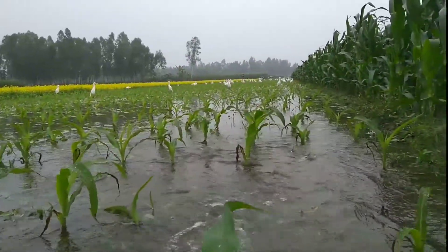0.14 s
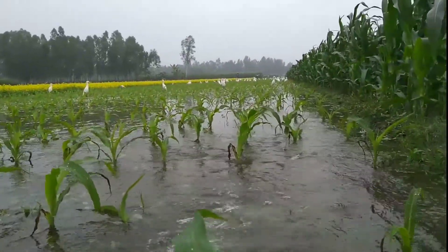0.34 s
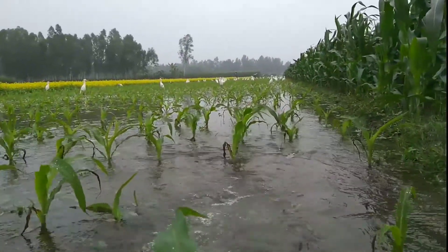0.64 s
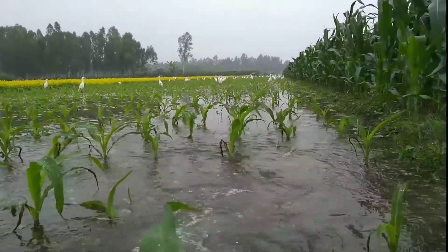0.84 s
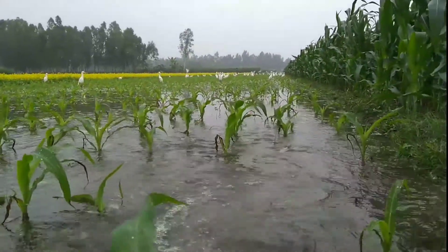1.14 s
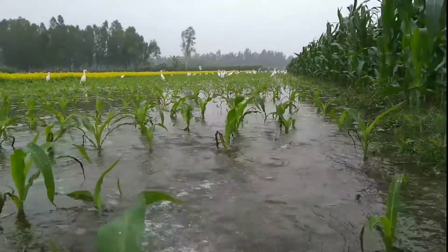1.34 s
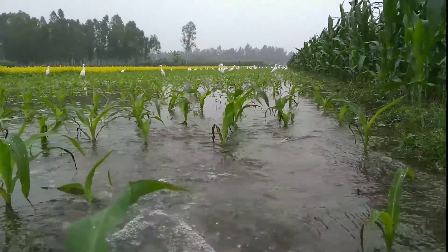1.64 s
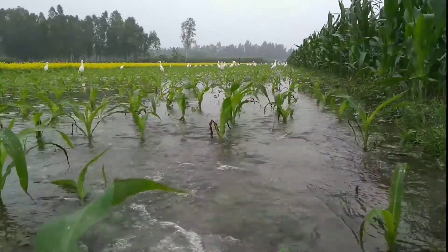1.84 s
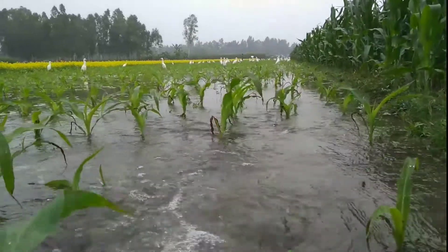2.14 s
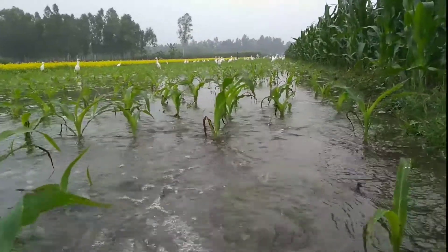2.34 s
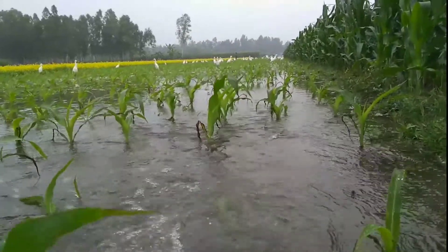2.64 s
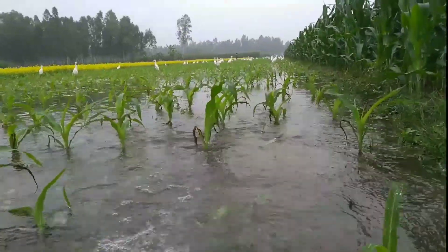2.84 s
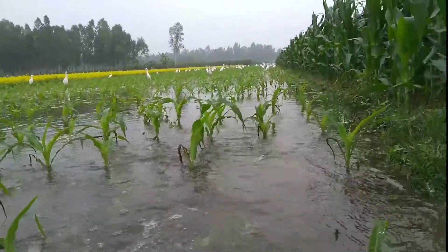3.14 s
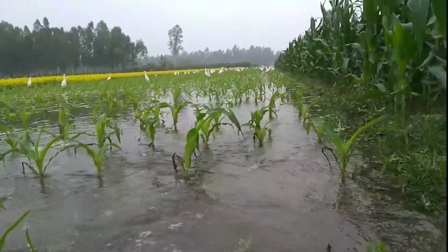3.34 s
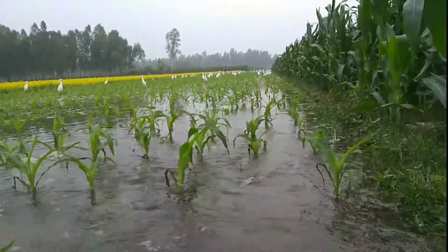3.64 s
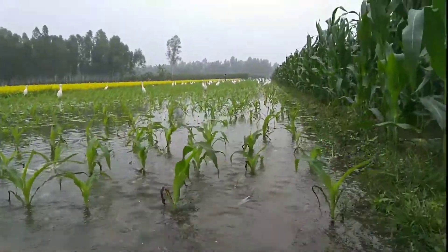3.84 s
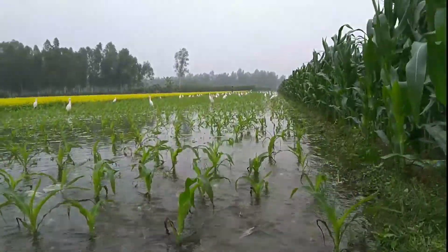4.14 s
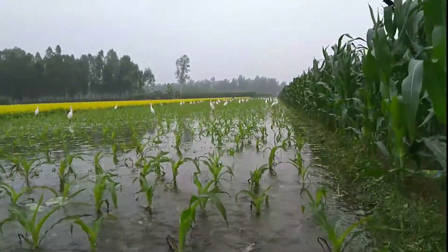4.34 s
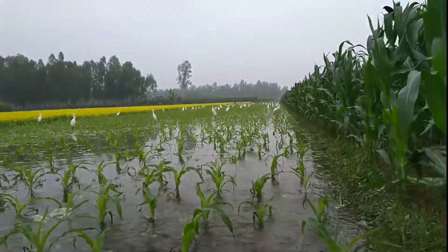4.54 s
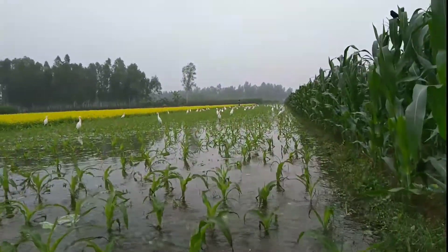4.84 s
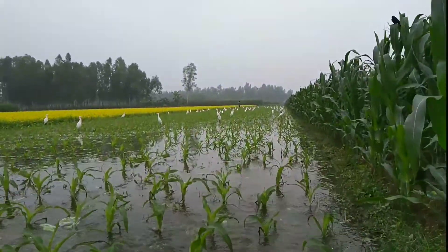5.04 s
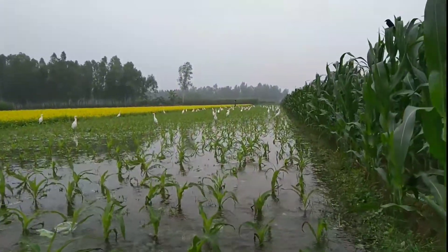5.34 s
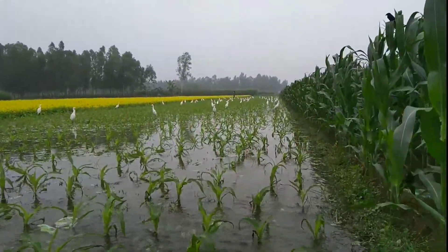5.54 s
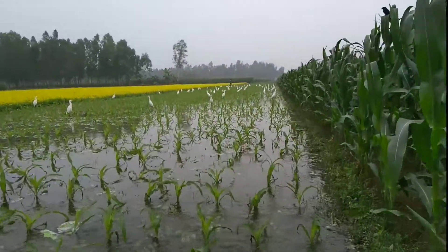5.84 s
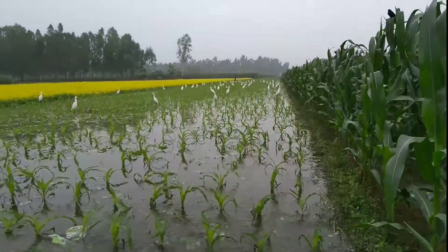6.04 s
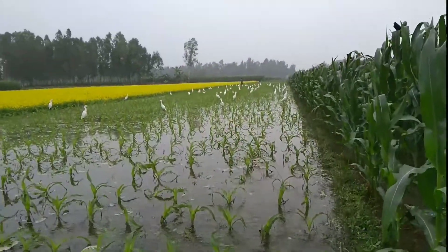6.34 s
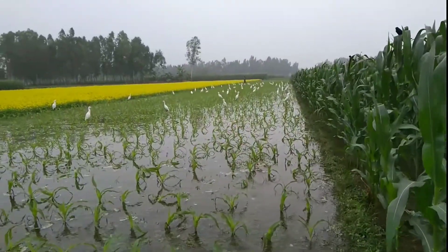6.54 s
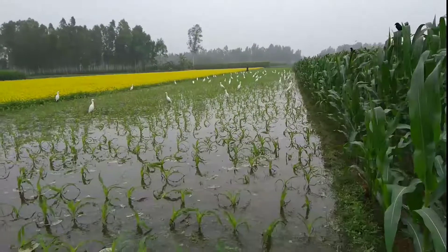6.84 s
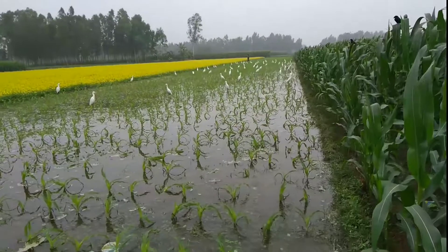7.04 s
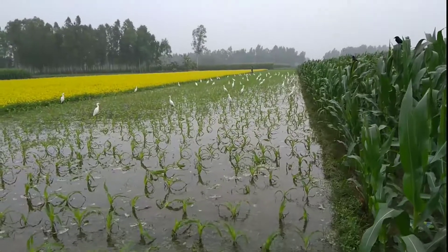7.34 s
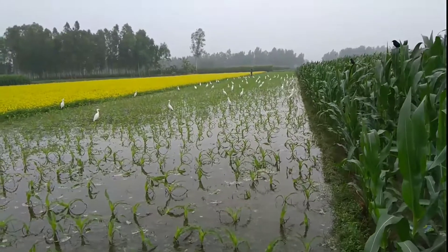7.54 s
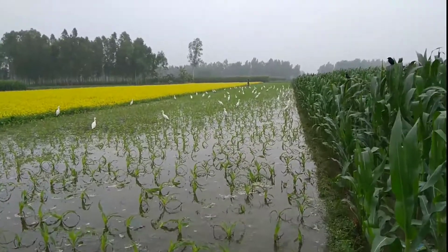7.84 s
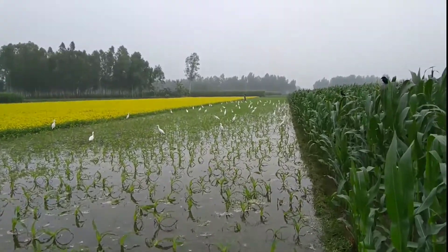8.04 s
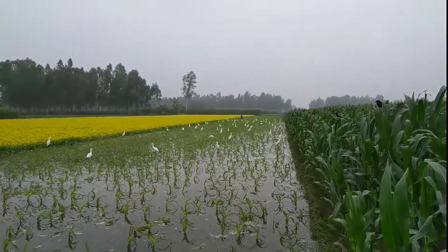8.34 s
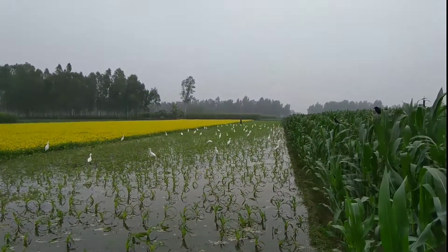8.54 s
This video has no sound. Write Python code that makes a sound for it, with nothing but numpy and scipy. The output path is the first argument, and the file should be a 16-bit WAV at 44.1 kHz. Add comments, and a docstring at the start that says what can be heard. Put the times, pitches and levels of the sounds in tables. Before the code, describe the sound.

Water runs through a flooded maize field close to a hand-held microphone, burbling and fizzing with countless small bubbles, glugs, clear pops and bright drips. Wind thuds on the microphone around the first second and again midway. After about five seconds the stream falls behind, thinning to a watery, warbling trickle, and a few last sloshes fade almost to silence.

```python
"""Irrigation water runs between young maize plants in a flooded field, close to a hand-held microphone. From
the start, countless ringing air bubbles burble and fizz, with glugs, clear pops and bright drips. Within the
first second, gusts begin to thud on the microphone. A narrow notch cuts the water's sound and drifts as the
microphone turns. After about five seconds the stream changes colour and a noise suppressor thins it to a
warbling trickle, while water and wind fade out together through a few last sloshes."""
import sys
import numpy as np
from scipy import signal
from scipy.fft import rfft, irfft
from scipy.io import wavfile
from scipy.ndimage import uniform_filter1d

SR = 44100
rng = np.random.default_rng(int(sys.argv[2]) if len(sys.argv) > 2 else 0)


def master_out(mix):
    """Clip the mix to full scale and print it as 16-bit PCM to the path in sys.argv[1]."""
    frames = np.transpose(np.atleast_2d(mix))
    ceiling = np.clip(frames, -1, 1)
    pcm = np.round(ceiling * 32767).astype(np.int16)
    wavfile.write(sys.argv[1], SR, pcm)


N = 383140

# The stream's EQ curve, applied twice over up close and once far off: freq_hz, gain_db
STREAM_EQ = [(88, -39.5), (150, -3.5), (250, -4.5), (500, -1.5), (790, -6), (980, -6.5), (1400, -6),
             (2150, -9), (2500, -9.5), (5000, -10), (6800, -11.5), (9000, -14), (11000, -13),
             (15500, -19.5)]
# EQ blended in as the water falls behind: freq_hz, gain_db
DISTANCE_EQ = [(100, -38), (180, -8.5), (350, -17.5), (650, -12.5), (1300, -9.5), (1750, -9), (2300, 2.5),
               (3300, -0.5), (4300, -3.5), (6000, -15), (9000, -29), (11100, -30.5), (13500, -20),
               (15700, -21.5)]
# The microphone's move: time_s, notch_hz, notch_depth (0-1), distance (0-1), suppressor_strength
MIC_MOVE = [(0, 2580, 0.6, 0.28, 0.02), (1, 2630, 0.6, 0.2, 0.062), (2, 3000, 0.46, 0, 0.04),
            (2.6, 2980, 0.86, 0.1, 0.031), (3.3, 3330, 0.85, 0.03, 0.11), (4, 3610, 0.7, 0.04, 0.085),
            (4.78, 3560, 0.53, 0.02, 0.18), (4.92, 3610, 1, 0, 0.24), (6, 3325, 1, 0, 0.27),
            (6.7, 3010, 0.93, 0.53, 0.51), (7.2, 2905, 0.91, 1, 1.24), (8.69, 3076, 1, 0.75, 1.63)]
# Faders for the water's low, mid and high bands and the wind:
# time_s, gurgle_db, burble_db, spray_db, breeze_db
FADERS = [(0, -39.5, -34.5, -45, -48.5), (1.3, -42.5, -34, -45, -47.5), (2.93, -38.5, -32, -45, -48),
          (4.3, -44, -33.5, -46, -46.5), (5.39, -47, -37, -54, -46.5), (5.76, -54, -38.5, -59.5, -48.5),
          (6.1, -53.5, -42.5, -68, -53.5), (6.85, -64.5, -48.5, -70.5, -57.5),
          (7.451, -91, -61, -76.5, -61), (7.801, -81, -58.5, -79, -68.5), (8.349, -88.5, -75, -85, -72.5),
          (8.69, -100.5, -84.5, -101, -85.5)]
# More water tumbling at once (negative is a brief hush): peak_s, gurgle_db, burble_db, spray_db
SLOSH_BOOSTS = [(.22, 0.5, 3, 3), (0.478, -1, 5, 4.5), (.665, 3, 0.5, 2.5), (.9, 4, 2.5, 1),
                (1.27, -16, 3, 4), (1.36, 2, 3.5, 3), (1.45, 5.5, 2.5, 4.5), (1.98, 0, 6.5, 0),
                (2.145, 4, 2.5, 0), (2.339, -0.5, 3, 1), (2.44, -1, 4.5, 5.5), (3.649, 6.5, 2, -1),
                (3.421, 0.5, 5.5, -1), (3.899, 11.5, 1, 0), (4.228, 11, 1.5, -3), (5.62, 9.5, 0.5, 2),
                (6.041, 9.5, -0.5, 5), (6.385, -10, -4.5, 15), (6.521, 7.5, 5.5, -6), (6.92, 9, 2.5, 2),
                (7.02, 1, 0, 12), (7.115, 5, 1.5, 14), (7.22, -6, 0.5, 9), (7.361, 21.5, 4.5, 13),
                (7.559, 22, 4, 22.5), (8.001, 1, 0, 2), (8.104, 23.5, 6.5, 5), (8.18, 12.5, 4.5, 2)]
# Tone of the wind on the microphone: freq_hz, gain_db
WIND_EQ = [(15, -58), (32, -36.5), (50, -9), (70, -2.5), (97, 2.5), (160, -9.5), (260, -15), (370, -54),
           (660, -120)]
# Gusts rising above the breeze: middle_s, length_s, boost_db
WIND_GUSTS = [(0.71, 0.29, 5), (0.95, 0.095, 13), (1.083, 0.12, 11.5), (1.323, 0.17, 12.5),
              (4.207, 0.144, 9.5), (4.554, 0.063, 3.5), (4.886, 0.13, 9), (5.258, 0.13, 11),
              (5.512, 0.1, 10.5), (5.718, 0.071, 11)]
# Bubbles whose pitch slides audibly: start_s, length_s, from_hz, to_hz, level_db
SLIDING_BUBBLES = [(0.048, 0.0385, 576, 234, -38), (1.33, .05, 645, 1024, -34),
                   (5.133, 0.056, 2090, 994, -38), (5.285, 0.053, 3060, 4030, -44),
                   (5.382, 0.049, 1005, 1530, -45), (8.1, 0.028, 600, 1140, -68)]
# Clear single bubbles: start_s, ring_db, nominal_pitch_hz, splat_gain_db
CLEAR_BUBBLES = [(0.071, -27.5, 1060, -15), (0.0725, -16.5, 5580, -40), (0.081, -27, 2300, -30),
                 (0.123, -24, 4240, -36), (0.229, -23.5, 668, -19), (0.284, -26, 994, -24),
                 (0.345, -26.5, 3200, -13.5), (0.441, -22.5, 3380, -35), (0.481, -21.5, 1090, -27),
                 (0.616, -22.5, 5240, -37), (0.648, -31, 616, -11), (0.978, -32, 590, -13.5),
                 (1.133, -20.5, 3580, -12), (1.22, -19, 3310, -10), (1.303, -23, 1390, -39),
                 (1.357, -18.5, 960, -34), (1.404, -22.5, 2410, -11.5), (1.438, -27.5, 393, -35),
                 (1.459, -28, 326, -35), (1.514, -16.5, 3500, -7.5), (1.579, -27.5, 1075, -2.5),
                 (1.652, -20.5, 2100, -38), (1.69, -29, 396, -37), (1.706, -24, 2480, -38),
                 (1.98, -20, 1540, -7), (1.992, -23, 1590, -8), (2.001, -31, 1510, -4),
                 (2.081, -23.5, 1560, -31), (2.144, -17, 1710, -13), (2.253, -30, 471, -35),
                 (2.338, -18.5, 1256, -23), (2.436, -21, 1700, -32), (2.469, -21.5, 1350, -35),
                 (2.488, -24.5, 1580, -11), (2.513, -13.5, 3630, -16), (2.568, -10.5, 4500, -34),
                 (2.709, -32.5, 418, -13), (2.734, -21.5, 1410, -36), (2.896, -22, 4240, -27),
                 (2.919, -19, 3670, -37), (2.944, -18.5, 4970, -34), (2.974, -22.5, 1370, -36),
                 (3.043, -19.5, 1550, -9), (3.085, -17, 5550, -34), (3.105, -17, 2480, -14),
                 (3.162, -26, 1600, -19), (3.251, -17.5, 4200, -5), (3.319, -15, 8430, -19),
                 (3.657, -17.5, 1545, -24), (3.772, -21.5, 545, -14.5), (3.881, -24, 1640, -5.5),
                 (4.021, -20.5, 1710, -14), (4.06, -24, 1780, -35), (4.089, -26, 375, -13),
                 (4.205, -18.5, 5160, -24), (4.325, -29, 1190, -28), (4.634, -26, 1760, -23),
                 (4.675, -21.5, 5360, -17), (4.698, -20, 6200, -18), (4.723, -29, 5040, -32),
                 (4.863, -21.5, 5200, -12), (4.993, -25.5, 1290, -44), (5.018, -32, 1100, -21),
                 (5.142, -22.5, 1950, -24), (5.246, -18, 6000, -36), (5.296, -21, 7200, -44),
                 (5.42, -31, 1420, -42), (5.449, -14, 4870, -20), (5.535, -29.5, 2200, -14.5),
                 (5.718, -36, 1040, -50), (6.043, -34.5, 426, -55), (6.238, -41, 417, -50),
                 (6.313, -30, 1780, -36), (6.513, -32.5, 1470, -53), (6.923, -27.5, 3890, -43),
                 (7.116, -42, 2030, -30), (7.236, -40, 2400, -64), (7.355, -56, 613, -49),
                 (7.438, -41, 4970, -45), (7.455, -34.5, 6830, -59), (7.503, -50.5, 1550, -68),
                 (7.561, -46, 4570, -48), (7.638, -51.5, 1270, -58), (7.744, -47, 4260, -78),
                 (7.999, -63, 1330, -58), (8.102, -58.5, 315, -41), (8.1035, -50, 4020, -63),
                 (8.177, -56, 2400, -80), (8.186, -55.5, 303, -80)]
# Drops heard singly in the spray: start_s, gain_db
SINGLE_DROPS = [(0.222, -18), (0.316, -13), (0.7268, -13), (0.7871, -11), (0.8724, -9), (0.9373, -10),
                (1.157, -9.5), (1.2286, -7), (1.262, -9), (3.441, -12.5), (3.5863, -15), (3.7254, -16),
                (4.281, -15), (4.3403, -15), (4.6014, -18), (4.663, -22), (5.22, -18), (7.355, -35),
                (7.425, -39)]

FRAME, HOP = 512, 128  # samples


def gain_of(db):
    return 10 ** (np.asarray(db) / 20)


def unit_rms(x):
    return x / np.sqrt(np.mean(x ** 2) + 1e-20)


def eq_db(curve, hz):
    freq_hz, gain_db = np.transpose(curve)
    return np.interp(np.log(hz + 1), np.log(freq_hz + 1), gain_db)


def automation(rows, t):
    time_s, *columns = np.transpose(rows)
    return [np.interp(t, time_s, column) for column in columns]


def spectra(x):
    return signal.stft(x, SR, nperseg=FRAME, noverlap=FRAME - HOP)


def blur(grid, bins, frames):
    return uniform_filter1d(uniform_filter1d(grid, bins, axis=0), frames, axis=1)


def patches(shape, bins, frames):
    """Random blotches over frequency and time, rms 1."""
    return unit_rms(blur(rng.standard_normal(shape), bins, frames))


def wander(smooth_s):
    """Smooth random drift, rms 1."""
    size = max(round(smooth_s * SR), 1)
    return unit_rms(uniform_filter1d(uniform_filter1d(rng.standard_normal(N), size), size))


def bubble(hz, ring_s, glide, rise_s):
    """A ringing air pocket whose pitch climbs as it nears the surface."""
    t = np.arange(round(ring_s * SR) + 8) / SR
    envelope = (1 - np.exp(-t / rise_s)) ** 2 * gain_of(-60 * t / ring_s)
    return envelope / envelope.max() * np.sin(2 * np.pi * hz * (t + glide * t ** 2 / (2 * ring_s)))


def bubble_bed(density, ring_scale, spread_db, clump_db):
    """Bubbles of all sizes ring in clumps as the surface breaks."""
    clumps = gain_of(clump_db * (wander(0.012) + 0.32 * wander(0.05)))
    out = np.zeros(N)
    for hz in np.geomspace(150, 15500, num=130):
        draw = rng.random(N)
        accent_db = spread_db * np.minimum(rng.exponential(1, N), 4)
        per_s = density * (hz / 1000) ** 0.45 * clumps  # small bubbles are the more numerous
        triggers = gain_of(accent_db) * np.clip((per_s - draw * SR) / 2, 0, 1)
        cycles = ring_scale * rng.uniform(0.38, 1.79) * (hz / 1000) ** 0.24
        ring = bubble(hz, cycles / hz, glide=0.12, rise_s=0.84 / hz)
        out += np.sqrt(hz) * unit_rms(signal.oaconvolve(triggers, ring)[:N])
    return unit_rms(out)


def wash(hz):
    """The spectrum of the patchy hiss under the bubbles."""
    hiss = spectra(rng.standard_normal(N))[2]
    tilt_db = 0.2 * np.log2(hz / 1000 + 0.075)
    return gain_of(-5.5 + 1.9 * patches(hiss.shape, bins=6, frames=14) + tilt_db) * hiss


def spatter(hz, strength, per_s, spread_db):
    """Drops strike the surface in short, bright splats that soften as the water falls behind."""
    tint = patches((len(hz), len(strength)), bins=24, frames=3)  # each drop has its own band
    accent_db = spread_db * np.minimum(rng.exponential(1, N), 3)
    hits = gain_of(accent_db) * np.clip((per_s - rng.random(N) * SR) / 2, 0, 1)
    envelope = signal.lfilter([1], [1, -np.exp(-1 / (0.0021 * SR))], hits)
    splats = spectra(unit_rms(envelope * rng.standard_normal(N)))[2]
    tilt_db = 4.4 * np.log2(hz / 5000 + 0.01)
    return gain_of(6.3 * np.minimum(tint, 1.4) - 6.5 - 5.6 * strength + tilt_db) * splats


def notches(hz, t, notch_hz, depth, strength):
    """Cuts a narrow notch and, once the suppressor has thinned the wash, a wider one higher up."""
    sample_s = np.arange(N) / SR
    depth = np.clip(depth + 0.18 * np.interp(t, sample_s, wander(0.041)), 0, 1)  # the notch deepens and fades
    notch_hz = notch_hz * (1 + 0.0091 * np.interp(t, sample_s, wander(0.035)))  # the hand wavers
    half_width_hz = 170 + 900 * np.minimum(strength, 0.3)
    lower = 1 - depth / (1 + ((hz - notch_hz) / half_width_hz) ** 2)
    upper = 1 - np.clip(6.6 * strength - 0.9, 0, depth) / (1 + ((hz - 2.7 * notch_hz) / 900) ** 2)
    return lower * upper


def suppressor(water, strength):
    """Takes the running background off each bin, so weak bins sink and strong ones warble on."""
    power = abs(water) ** 2
    background, now = blur(power, bins=17, frames=200), blur(power, bins=2, frames=20)
    kept = np.sqrt(np.maximum(1 - strength * background / (now + 1e-30), 0))
    return water * np.maximum(kept, gain_of(-16))


def sloshes(t, distance, hush_s=0.03):
    """Tumbling water rides each band, in dB: a hush, a quick rise, a slower fall, another hush."""
    rows = np.array(SLOSH_BOOSTS)
    since = t - rows[:, :1]
    rise_s, fall_s = 0.022 * (1 - 0.9 * distance), 0.034 * (1 + 2.2 * distance)
    swell = np.exp(-np.where(since < 0, since / rise_s, since / fall_s) ** 2)
    hush_before = np.exp(-((since + rise_s + hush_s) / hush_s) ** 2)
    hush_after = np.exp(-((since - fall_s - hush_s) / hush_s) ** 2)
    return rows[:, 1:].T @ (swell - (1 - swell) * (0.38 * hush_before + 0.16 * hush_after))


def ride_faders(water, hz, t, distance):
    """Brings gurgle, burble and spray to their fader levels, sloshes on top."""
    low, high = np.clip((950 - hz) / 200, 0, 1), np.clip((hz - 7000) / 2000, 0, 1)
    targets_db = automation(FADERS, t)[:3] + sloshes(t, distance)
    lift_db = 0
    for band, target_db in zip((low, 1 - low - high, high), targets_db):
        mean_square = uniform_filter1d((band * abs(water) ** 2).sum(0), size=50) * 4 / 3
        lift_db = lift_db + band * (target_db - 10 * np.log10(mean_square + 1e-30))
    return water * gain_of(lift_db)


def stream():
    """Bubbles and drops over a wash, coloured by the field and by the microphone."""
    hz, t, bed = spectra(bubble_bed(density=25, ring_scale=24.2, spread_db=4.5, clump_db=2.5))
    hz = hz[:, None]
    notch_hz, depth, distance, strength = automation(MIC_MOVE, t)
    water = bed * gain_of(-1.8 * distance) + wash(hz)  # far bubbles blend into the wash
    water += spatter(hz, strength, per_s=20, spread_db=6)
    water *= notches(hz, t, notch_hz, depth, strength)
    water *= gain_of(3.2 * distance * patches(water.shape, bins=5, frames=40))  # the trickle breaks up
    water *= gain_of((2 - distance) * eq_db(STREAM_EQ, hz) + distance * eq_db(DISTANCE_EQ, hz))
    water = ride_faders(suppressor(water, strength), hz, t, distance)
    return signal.istft(water, SR, nperseg=FRAME, noverlap=FRAME - HOP)[1][:N]


def wind():
    """Air buffets the microphone with a lumpy rumble; each gust swells and sinks smoothly."""
    hz, t = np.fft.rfftfreq(N, 1 / SR), np.arange(N) / SR
    rumble = irfft(rfft(rng.standard_normal(N)) * gain_of(eq_db(WIND_EQ, hz)), N)
    buffeting = unit_rms(rumble * gain_of(3.1 * wander(0.0069)))
    gusts_db = [db * np.exp(-(2 * (t - middle_s) / length_s) ** 4)
                for middle_s, length_s, db in WIND_GUSTS]
    return gain_of(automation(FADERS, t)[3] + np.max(gusts_db, axis=0)) * buffeting


def glugs():
    """Each bubble sings a soft, unsteady tone that slides between two pitches."""
    out = np.zeros(N)
    for start_s, length_s, from_hz, to_hz, db in SLIDING_BUBBLES:
        hz = np.geomspace(from_hz, to_hz, num=round(length_s * SR))
        tone = np.sin(2 * np.pi * np.cumsum(hz) / SR)
        out[round(start_s * SR):][:len(hz)] += gain_of(db) * np.hanning(len(hz)) * tone
    return out * gain_of(4 * wander(0.0015))


def pops():
    """A clear bubble splats and rings briefly, a weaker neighbour following; the plants scatter it."""
    out, t = np.zeros(N + SR), np.arange(900) / SR
    neighbours = rng.random((len(CLEAR_BUBBLES), 2))
    noise = rng.standard_normal((len(CLEAR_BUBBLES), len(t)))
    splats = signal.sosfilt(signal.butter(2, [4500, 12500], "band", fs=SR, output="sos"), noise)
    splats *= (1 - np.exp(-t / 0.0015)) * gain_of(-60 * t / 0.0097)
    for (start_s, db, hz, splat_db), (detune, lag), splat in zip(CLEAR_BUBBLES, neighbours, splats):
        ring_s = 30 * (hz / 1000) ** 0.17 / hz
        neighbour = (0.0013 + 0.0016 * lag, hz * (0.95 + 0.24 * detune), db - 6.5)
        for delay_s, pitch, level_db in ((0, hz, db), neighbour):
            ring = bubble(0.98 * pitch, ring_s, glide=0.08, rise_s=0.94 / hz)
            out[round((start_s + delay_s) * SR):][:len(ring)] += gain_of(level_db) * ring
        out[round(start_s * SR):][:len(t)] += gain_of(splat_db) * splat
    scatter = rng.standard_normal(3000) * gain_of(-60 * np.arange(3000) / SR / 0.1)
    out = out[:N] + gain_of(-11) * signal.oaconvolve(out, scatter / np.linalg.norm(scatter))[:N]
    return signal.sosfilt(signal.butter(2, 180, "high", fs=SR, output="sos"), out)


def drips():
    """Single drops cut through the spray as tiny bright ticks."""
    out, t = np.zeros(N + SR), np.arange(300) / SR
    noise = rng.standard_normal((len(SINGLE_DROPS), len(t)))
    ticks = signal.sosfilt(signal.butter(2, [6500, 13500], "band", fs=SR, output="sos"), noise)
    ticks *= gain_of(-60 * t / 0.002)
    for (start_s, db), tick in zip(SINGLE_DROPS, ticks):
        out[round(start_s * SR):][:len(t)] += gain_of(db) * tick
    return out[:N]


def scene():
    """Water and wind in one mono mix."""
    return (stream() + pops() + glugs() + wind() + drips())[None]


def record(dry):
    """A steep high cut takes off the very top."""
    high_cut = signal.firwin(511, cutoff=15750, window=("kaiser", 9), fs=SR)
    return signal.oaconvolve(dry, high_cut[None], "same")


dry = scene()
out = record(dry)
master_out(out)
```